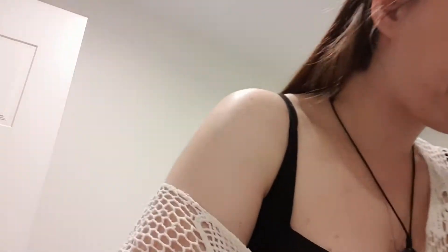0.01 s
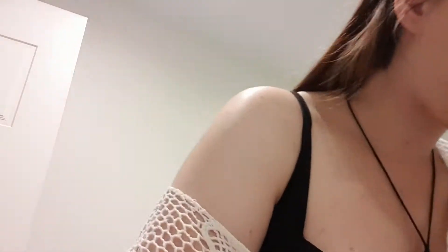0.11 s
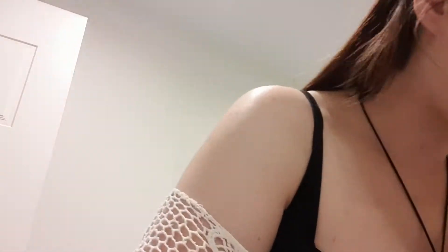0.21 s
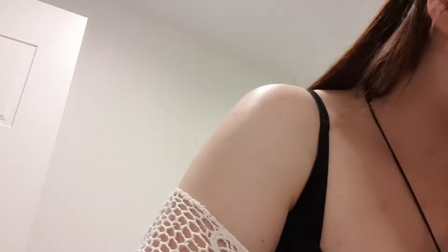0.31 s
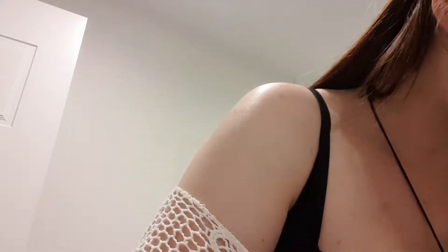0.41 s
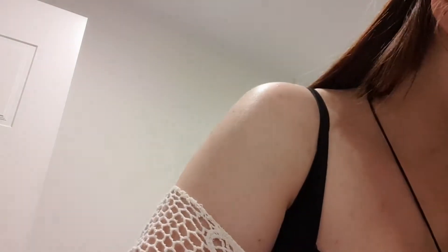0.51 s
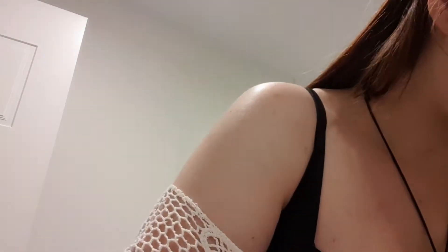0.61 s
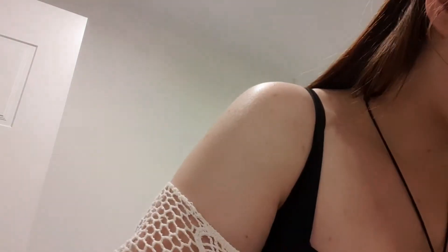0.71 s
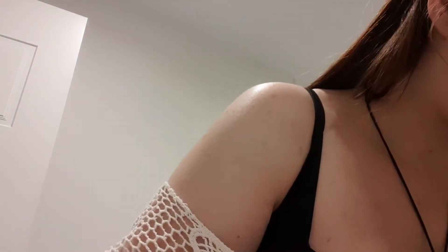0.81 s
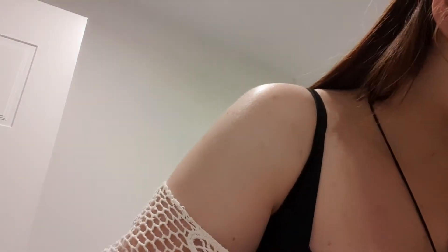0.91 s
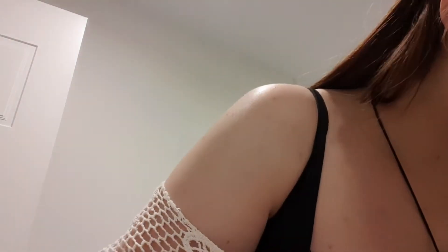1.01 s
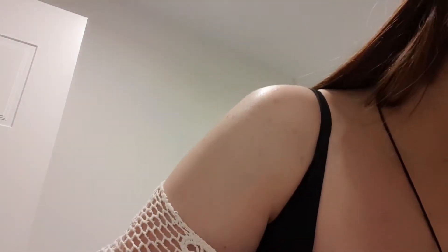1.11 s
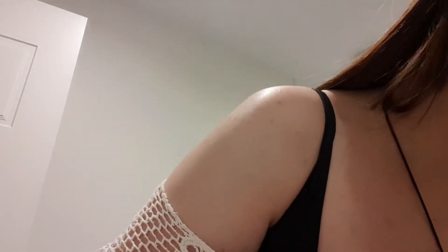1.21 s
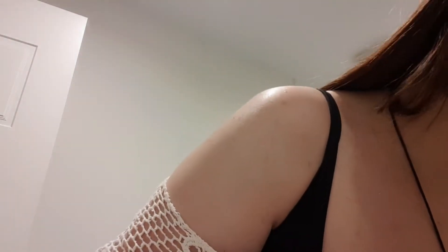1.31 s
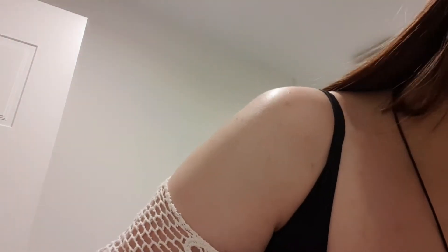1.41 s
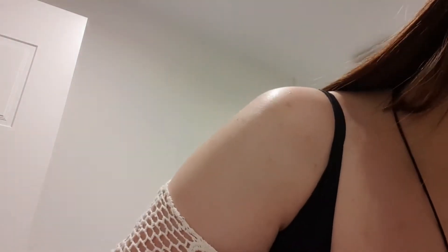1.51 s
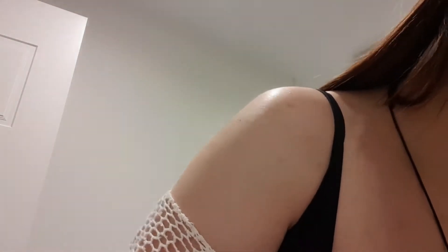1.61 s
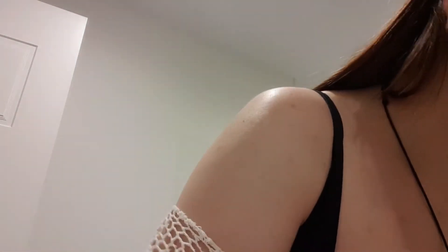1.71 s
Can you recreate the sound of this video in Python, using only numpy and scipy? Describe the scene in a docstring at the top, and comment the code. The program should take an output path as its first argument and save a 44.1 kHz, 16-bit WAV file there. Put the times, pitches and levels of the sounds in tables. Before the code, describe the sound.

Someone spits toothpaste into a bathroom basin, followed by drips and a light clatter.

```python
"""A small, hard bathroom, at the basin, on a stereo microphone whose right side is shaded and duller.
Someone spits out toothpaste: a thin hiss widens into a jet, then breaks into wet spatter that drums on
the bowl while bubbles burst. Small drips, a short hollow note and the knocks and clatter of things
being handled follow. The walls ring on, their reflections shifting as the person moves."""
import sys
import numpy as np
from scipy import signal
from scipy.fft import rfft, irfft
from scipy.io import wavfile

SR = 44100
rng = np.random.default_rng(int(sys.argv[2]) if len(sys.argv) > 2 else 0)


def wav_record(signal):
    """Record a signal, one row per channel, as 16-bit PCM in the file named by sys.argv[1]."""
    frames = np.transpose(np.atleast_2d(signal))
    bounded = np.clip(frames, -1, 1)
    # unit amplitude maps onto the largest positive 16-bit level
    quanta = np.round(bounded * 32767).astype(np.int16)
    wavfile.write(sys.argv[1], SR, quanta)


N = 79380
T = np.arange(N) / SR


def amp(db):
    """Decibels to gain."""
    return 10 ** (np.asarray(db) / 20)


def unit(x):
    """Scale to rms 1."""
    return x / np.sqrt(np.mean(x ** 2))


def noise():
    """White noise."""
    return rng.standard_normal(N)


def on_log(hz, points):
    """Read (frequency [Hz], value) points on a log-frequency axis."""
    f, values = np.array(points, float).T
    return np.interp(np.log(np.maximum(hz, 1)), np.log(f), values)


def filtered(x, gain_at, size=4096):
    """Minimum-phase filter with the given gain over frequency."""
    gain = np.maximum(gain_at(np.fft.rfftfreq(size, 1 / SR)), 1e-6)
    cepstrum = irfft(np.log(gain))
    cepstrum[1:size // 2] *= 2
    cepstrum[size // 2 + 1:] = 0
    impulse = irfft(np.exp(rfft(cepstrum)))[:size // 2]
    return signal.oaconvolve(x, impulse)[:N]


def colour(x, points):
    """Give a sound a spectrum, keeping the power of white noise."""
    return filtered(x, lambda f: unit(amp(on_log(f, points))))


def resonate(x, hz, width):
    """One resonance, width in Hz, keeping the power of white noise."""
    b, a = signal.iirpeak(min(hz, .45 * SR), hz / width, fs=SR)
    return signal.lfilter(b, a, x) * np.sqrt(SR / (np.pi * width))


def ring(x, modes, size=12000):
    """Drive a set of damped modes, with no deep bass."""
    t = T[:size]
    body = sum(amp(db) * np.sin(2 * np.pi * hz * t) * amp(-60 * t / t60) for hz, db, t60 in modes)
    body = signal.sosfilt(signal.butter(4, 115, "high", fs=SR, output="sos"), body)
    return signal.oaconvolve(x, body)[:N]


def drops(per_s, spread_db):
    """Random impacts, a few much larger than the rest; rms 1."""
    hits = rng.random(N) < per_s / SR
    size = np.minimum(rng.exponential(size=N), 4.5)
    return unit(hits * np.sign(noise()) * amp(spread_db * size))


def swell(start, attack, end, release, db):
    """Attack, hold and exponential release; times in seconds."""
    rise = np.clip((T - start) / attack, 0, 1) ** 2
    return amp(db) * rise * np.exp(-2 * np.maximum(T - end, 0) / release)


def curve(points):
    """Gain from (time [s], level [dB]) points."""
    return amp(np.interp(T, *np.array(points).T))


def burst(start, db, decay, size=8192):
    """A short contact: noise that starts at once and dies away."""
    out, i = np.zeros(N + size), int(start * SR)
    out[i:i + size] = amp(db) * rng.standard_normal(size) * np.exp(-T[:size] / decay)
    return out[:N]


def tap(start, db):
    """A single clean blow."""
    return amp(db) * (np.arange(N) == int(start * SR))


def bumps(push_db=20):
    """Soft handling: each contact rubs, and thuds with a hard first push. Returns (rubs, thuds)."""
    # contacts: (time [s], thud level [dB], decay [s], rub level [dB])
    contacts = [(.002, -38, .012, -44), (.015, -42, .01, -40), (.039, -41, .012, -47),
                (.075, -54, .04, -57), (.112, -45, .012, -59), (1.12, -56, .025, -74),
                (1.402, -54, .012, -74), (1.431, -47, .025, -66), (1.495, -53, .04, -72)]
    # spectra of rub and thud: (frequency [Hz], level [dB])
    rub_colour = [(100, -10), (550, 0), (850, -5), (1300, -1), (1700, -6), (2200, -17), (8000, -24),
                  (16000, -35)]
    thud_colour = [(30, -20), (65, -3), (150, 0), (260, 0), (420, -8), (700, -24), (2000, -50),
                   (16000, -80)]
    rubs = sum(burst(start, db, decay) for start, _, decay, db in contacts)
    thuds = sum(tap(start, db + push_db) + burst(start, db, decay) for start, db, decay, _ in contacts)
    return colour(rubs, rub_colour), colour(thuds, thud_colour)


def rumble(hz=59, width=18):
    """A narrow band of low noise, strongest at the start."""
    # fade of the rumble: (time [s], level [dB])
    levels = [(0, -47), (.16, -49), (.23, -59), (.7, -58), (1.0, -61), (1.55, -69), (1.68, -85)]
    return unit(resonate(resonate(noise(), hz, width), hz, width)) * curve(levels)


def sizzle():
    """A faint sizzle ahead of the spit."""
    # its spectrum: (frequency [Hz], level [dB])
    spectrum = [(880, -33), (1500, -4), (3020, -13), (5670, -2), (7260, -5), (8490, -23), (12600, -11),
                (15800, -17)]
    return colour(noise() * swell(start=-.05, attack=.02, end=.17, release=.05, db=-57), spectrum)


def cracks(relative_width=.18, crack_db=-11):
    """Short pitched cracks: wet pops, drips and smacks, and the first click of the clatter."""
    # cracks: (time [s], level [dB], pitch [Hz], decay [s])
    events = [(.136, -45, 13000, .003), (.495, -22, 3900, .004), (.552, -21, 7400, .004),
              (.587, -27, 4200, .004), (.6005, -19, 4600, .002), (.636, -27, 3900, .004),
              (.673, -24.5, 2450, .007), (.676, -22, 3500, .008), (.709, -29, 2450, .005),
              (.713, -24, 3700, .008), (.779, -31, 6800, .004), (.8215, -37, 12500, .002),
              (.8345, -28.5, 11200, .004), (.939, -49, 11600, .002), (.9695, -38, 14500, .002),
              (.994, -49, 3200, .003), (1.228, -35, 3850, .004), (1.229, -40, 2200, .003),
              (1.323, -52, 2550, .008)]
    out = 0
    for start, db, hz, decay in events:
        push = burst(start, db, decay)
        out = out + resonate(push, hz, relative_width * hz) + amp(crack_db) * push
    return out


def bubbles(per_s, low_hz, high_hz, decay, db, size=1024):
    """Bursting bubbles, each a brief ping at its own pitch."""
    out, t = np.zeros(N + size), T[:size]
    for when, pitch, strength in rng.random((int(per_s * N / SR), 3)):
        i, hz = int(when * N), low_hz * (high_hz / low_hz) ** pitch
        out[i:i + size] += strength ** 2 * np.sin(2 * np.pi * hz * t) * np.exp(-t / decay)
    return amp(db) * unit(out[:N])


def jet():
    """The spit starts as a thin hiss and opens into fine spray, fizzing with tiny bubbles."""
    # spectra of hiss and spray: (frequency [Hz], level [dB])
    hiss_colour = [(300, -45), (3000, -27), (4200, -15), (4900, 0), (7600, 0), (8800, -8), (12000, -7),
                   (16000, -14)]
    spray_colour = [(280, -52), (470, -27), (700, -17), (1200, -17), (1710, -10), (2230, -13), (2950, -5),
                    (5640, -3), (7900, 1), (8800, -6), (11000, -1), (12900, -1), (15800, -10)]
    thin = swell(start=.203, attack=.02, end=.245, release=.045, db=-27.5)
    opened = swell(start=.2, attack=.055, end=.555, release=.052, db=-25.8)
    hiss = colour(noise() * thin, hiss_colour)
    spray = colour(drops(per_s=9000, spread_db=2.2) * opened, spray_colour)
    fizz = bubbles(per_s=260, low_hz=3300, high_hz=13000, decay=.0014, db=-8)
    return hiss + spray + fizz * opened


def bowl():
    """Liquid drums on the basin and sets its low modes going."""
    # basin modes: (frequency [Hz], level [dB], t60 [s])
    modes = [(140, -3, .16), (166, 2, .16), (195, -3, .08), (252, 0, .14), (280, 1, .14), (328, -6, .13),
             (560, -14, .16)]
    # drumming: (time [s], level [dB])
    drumming = [(.2, -58), (.42, -53), (.475, -39), (.57, -43), (.595, -32), (.635, -34), (.67, -42),
                (.705, -31), (.735, -39), (.79, -39), (.87, -53), (1.1, -62), (1.53, -63), (1.66, -82)]
    return unit(ring(noise(), modes)) * curve(drumming)


def spatter():
    """The jet breaks up into fewer, more uneven drops."""
    # flow of drops: (time [s], level [dB])
    flow = [(.43, -60), (.485, -33), (.59, -37), (.64, -36), (.67, -42), (.76, -100)]
    # their spectrum: (frequency [Hz], level [dB])
    spectrum = [(530, -45), (900, -15), (1240, -12), (2010, -17), (3210, -3), (4080, -1), (7600, -5),
                (8780, -11), (11800, -7), (15800, -13)]
    return colour(drops(per_s=1800, spread_db=3.3) * curve(flow), spectrum)


def gush():
    """A last wet gush, crackling with larger bubbles."""
    # spectrum of its drops: (frequency [Hz], level [dB])
    spectrum = [(300, -33), (450, -19), (570, -1), (880, -15), (1050, -4), (1950, -16), (2350, -6),
                (2900, -8), (3900, 0), (7800, -2), (8800, -8), (15800, -11)]
    flow = swell(start=.655, attack=.05, end=.745, release=.05, db=-29.5)
    splash = colour(drops(per_s=1800, spread_db=3.3) * flow, spectrum)
    crackle = bubbles(per_s=170, low_hz=2300, high_hz=6000, decay=.0018, db=-6)
    return splash + crackle * flow


def dribble():
    """The spit ends in a quiet, dull run of drops."""
    # their spectrum: (frequency [Hz], level [dB])
    spectrum = [(180, -34), (300, -3), (740, -14), (1010, -6), (1400, -15), (2550, -13), (8410, -22),
                (15800, -15)]
    flow = swell(start=.92, attack=.03, end=.98, release=.025, db=-49)
    return colour(drops(per_s=1500, spread_db=3) * flow, spectrum)


def hollow_note(hz=253):
    """A brief, pure low note."""
    level = swell(start=1.021, attack=.007, end=1.068, release=.01, db=-43)
    return np.sqrt(2) * np.sin(2 * np.pi * hz * T) * level


def knock():
    """A knock that rings briefly with a few wavering tones."""
    # its modes: (frequency [Hz], level [dB])
    modes = [(102, 3), (598, -1), (1028, -3), (1244, -14), (1798, -6), (2223, -16)]
    tones = 0
    for hz, db in modes:
        waver = 1 + .5 * resonate(noise(), hz=30, width=60)
        tones = tones + amp(db) * np.sin(2 * np.pi * hz * T) * waver
    return unit(tones) * swell(start=1.173, attack=.007, end=1.21, release=.025, db=-51)


def clatter(rattle_db=-24):
    """A thing put down clicks and scrapes; its hollow body rattles and rings. Returns (surface, body)."""
    # blows: (time [s], body level [dB], decay [s], click level [dB])
    blows = [(1.2275, -46, .005, -49), (1.2393, -48, .008, -46), (1.2511, -50, .007, -46),
             (1.2629, -56, .01, -49), (1.2865, -54, .009, -46)]
    # spectrum of clicks and scrape: (frequency [Hz], level [dB])
    surface_colour = [(500, -25), (900, -9), (1400, -7), (2300, -7), (3050, -11), (3850, 1), (4400, -3),
                      (6800, -4), (8900, -11), (14000, -7), (15800, -12)]
    # body modes: (frequency [Hz], level [dB], t60 [s])
    modes = [(176, -6, .12), (252, 0, .18), (338, -5, .28), (423, -5, .22), (489, -2, .14), (585, -12, .33),
             (785, -9, .1)]
    slide = swell(start=1.228, attack=.008, end=1.285, release=.022, db=-48.5)
    scrape = drops(per_s=2500, spread_db=2) * slide
    clicks = sum(burst(start, db, decay) for start, _, decay, db in blows)
    force = sum(tap(start, db) + burst(start, db + rattle_db, decay) for start, db, decay, _ in blows)
    return colour(scrape + clicks, surface_colour), ring(force, modes)


def tick():
    """A small hard contact with a few high resonances."""
    # resonances: (frequency [Hz], width [Hz], level [dB])
    peaks = [(2700, 500, -14), (3400, 800, -1), (5680, 400, -7), (7070, 900, -5), (9000, 12000, 0)]
    push = burst(start=1.4935, db=-47, decay=.002)
    return sum(amp(db) * resonate(push, hz, width) for hz, width, db in peaks)


def room_tail(gap_s=.003, size=32768):
    """Dense reflections off hard walls, each band with its own decay; energy 1."""
    # reverberation: (frequency [Hz], t60 [s])
    decays = [(150, .5), (1000, .6), (2200, .39), (14000, .35)]
    spectrum = rfft(rng.standard_normal(size))
    f, t = np.fft.rfftfreq(size, 1 / SR), T[:size]
    tail = 0
    for hz, t60 in decays:
        band = on_log(f, [(centre, centre == hz) for centre, _ in decays])
        tail = tail + irfft(spectrum * band) * amp(-60 * t / t60)
    return unit(tail * (t > gap_s)) / np.sqrt(size)


def reflections(x):
    """Left and right reverberation, alike only in the bass."""
    left, other = room_tail(), room_tail()
    right = other + signal.sosfiltfilt(signal.butter(2, 500, fs=SR, output="sos"), left - other)
    return np.array([signal.fftconvolve(x, tail)[:N] for tail in (left, right)])


def noise_floor(db=-78):
    """Faint steady noise, separate on each side."""
    # its spectrum: (frequency [Hz], level [dB])
    spectrum = [(24, -35), (40, -5), (400, -5), (1840, -23), (4200, -24), (7000, -13), (8450, -26),
                (15800, -20)]
    return amp(db) * np.array([colour(noise(), spectrum) for _ in range(2)])


def scene(sway_hz=2.5, right_bright_db=-5, right_lag_s=.00033):
    """Direct sound and room at the microphone; sharp and low sounds are drier than the spit."""
    rubs, thuds = bumps()
    clatter_surface, clatter_body = clatter()
    noisy = rubs + sizzle() + jet() + spatter() + gush() + dribble() + clatter_surface
    sharp = cracks() + knock() + tick()
    low = thuds + rumble() + bowl() + hollow_note() + clatter_body
    to_walls = amp(-1) * noisy + amp(-5) * sharp + amp(-11) * low
    sway = 2 * np.pi * sway_hz * T  # the moving body swings between two patterns of reflections
    room = reflections(to_walls * np.cos(sway)) + reflections(to_walls * np.sin(sway))
    bright = noisy + sharp
    right = np.interp(T - right_lag_s, T, amp(right_bright_db) * bright + low)
    return np.array([bright + low, right]) + room + noise_floor()


def record(dry, gain_db=2.5, top_hz=15900):
    """The stereo microphone: its right port is shaded, and the top is cut on both sides."""
    # shading of the right port: (frequency [Hz], loss [dB])
    shade = [(60, 3.5), (250, 6), (600, 4.5), (1000, 8), (2000, 2), (4500, 14), (8000, 5.5), (13000, 12.5)]
    left = dry[0] * amp(gain_db)
    right = filtered(dry[1], lambda f: amp(gain_db - on_log(f, shade)))
    top_cut = signal.ellip(10, .2, 80, top_hz, fs=SR, output="sos")
    return signal.sosfilt(top_cut, np.array([left, right]))


dry = scene()
out = record(dry)
wav_record(out)
```